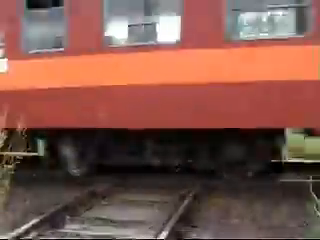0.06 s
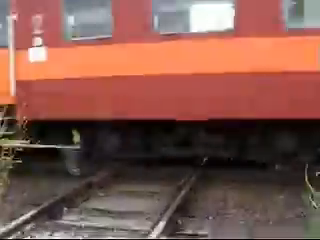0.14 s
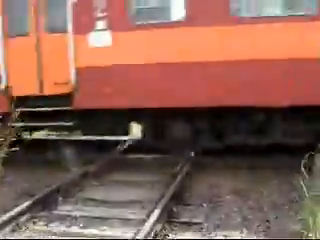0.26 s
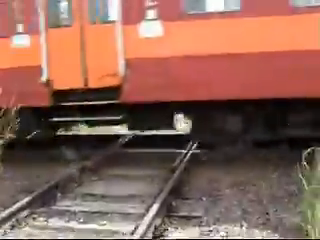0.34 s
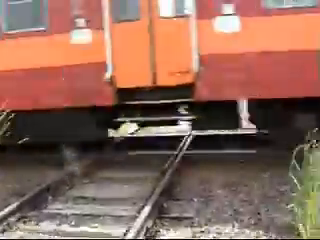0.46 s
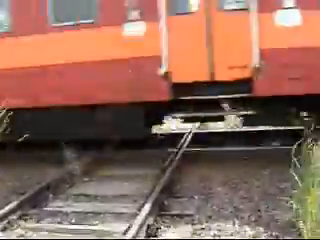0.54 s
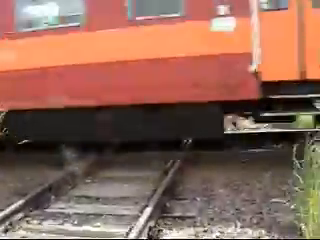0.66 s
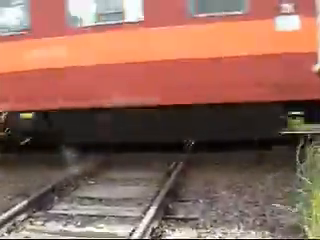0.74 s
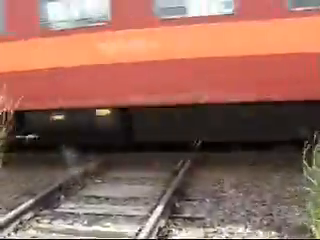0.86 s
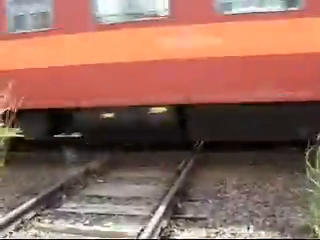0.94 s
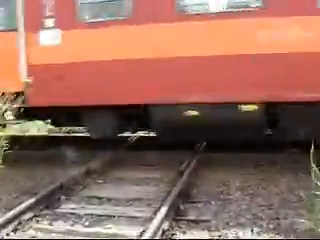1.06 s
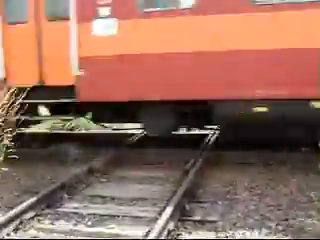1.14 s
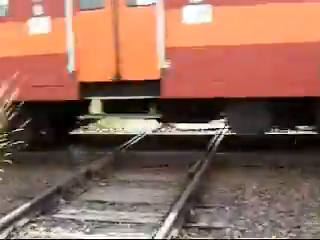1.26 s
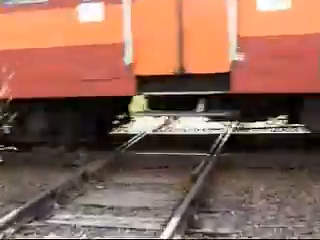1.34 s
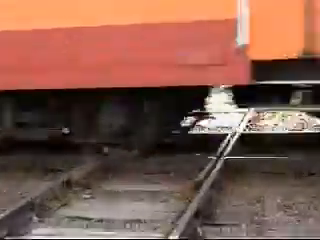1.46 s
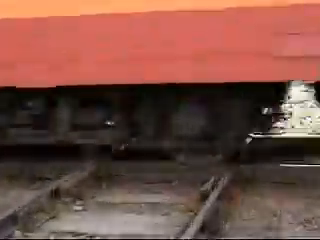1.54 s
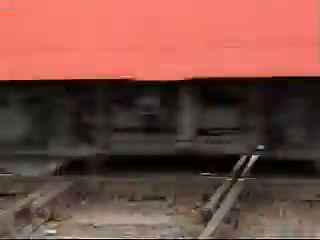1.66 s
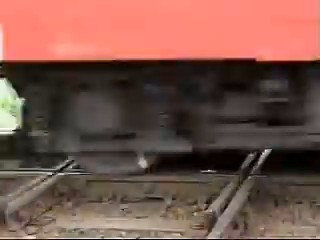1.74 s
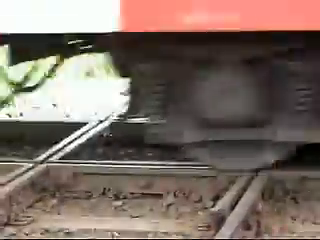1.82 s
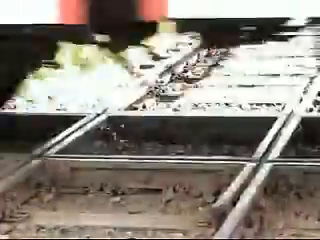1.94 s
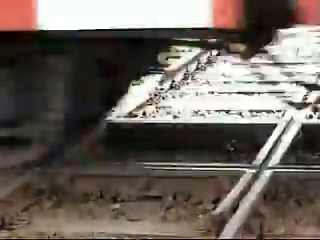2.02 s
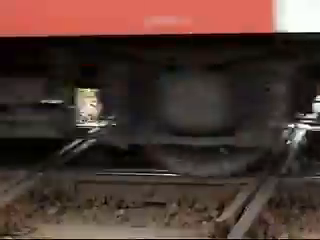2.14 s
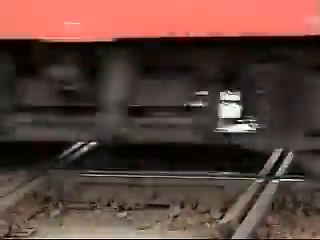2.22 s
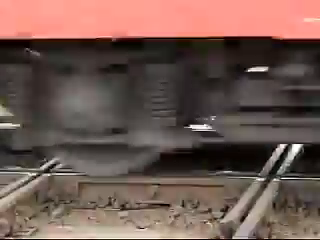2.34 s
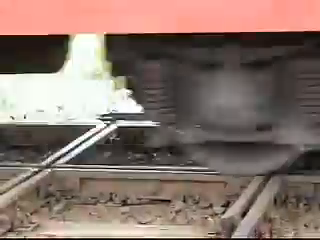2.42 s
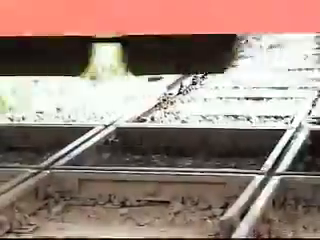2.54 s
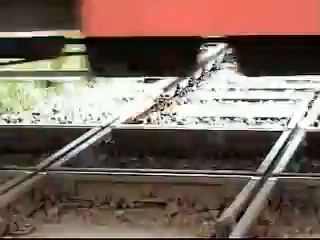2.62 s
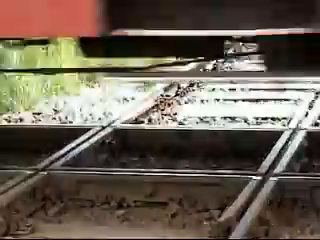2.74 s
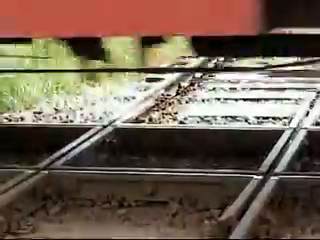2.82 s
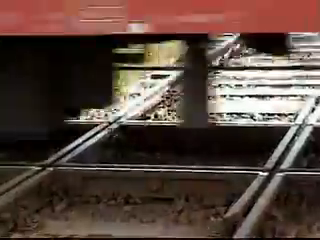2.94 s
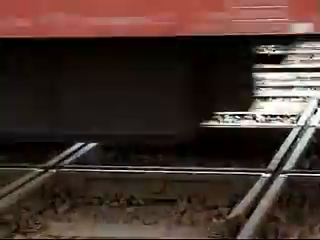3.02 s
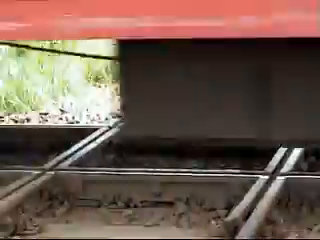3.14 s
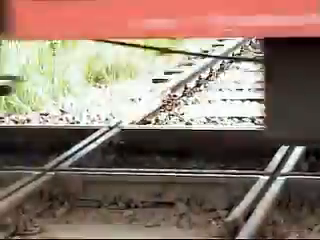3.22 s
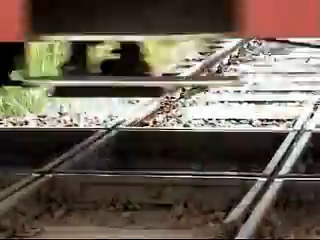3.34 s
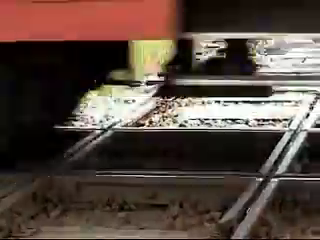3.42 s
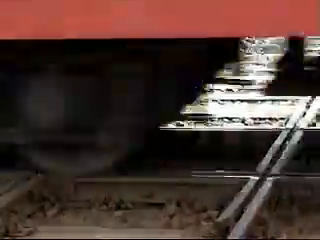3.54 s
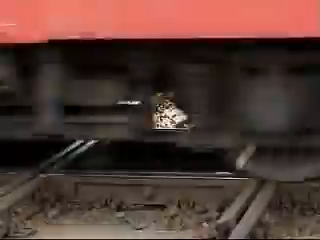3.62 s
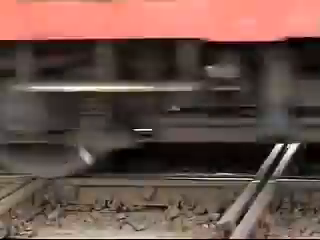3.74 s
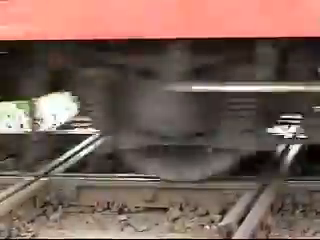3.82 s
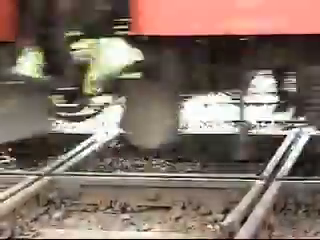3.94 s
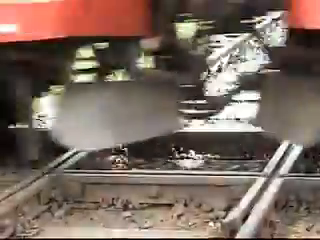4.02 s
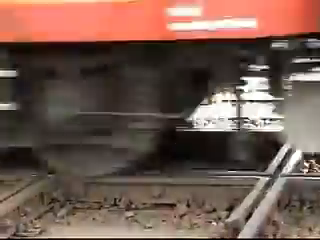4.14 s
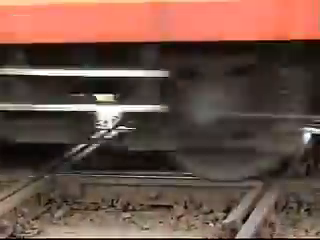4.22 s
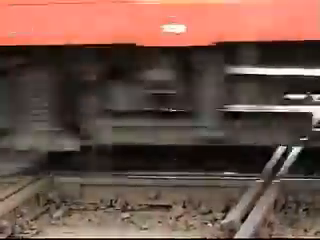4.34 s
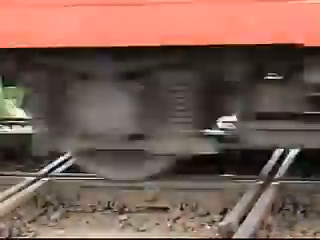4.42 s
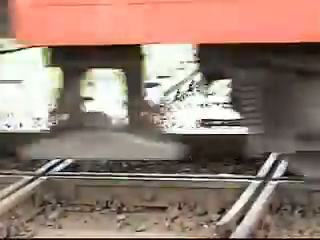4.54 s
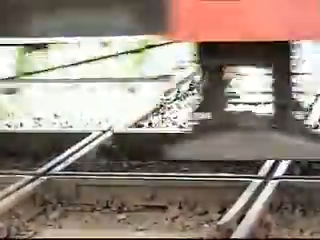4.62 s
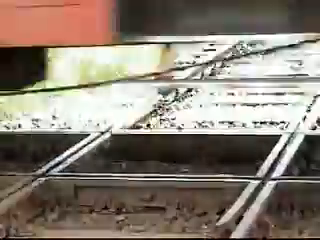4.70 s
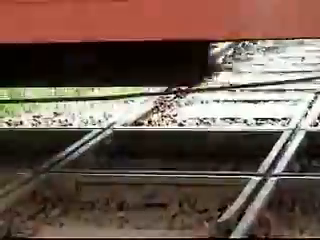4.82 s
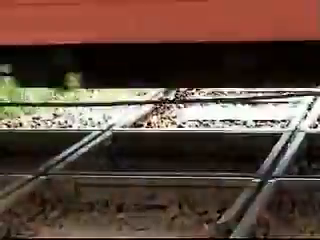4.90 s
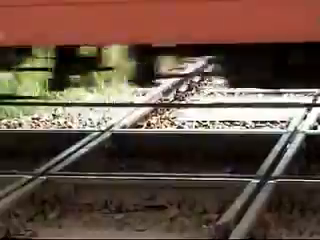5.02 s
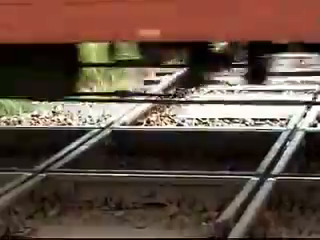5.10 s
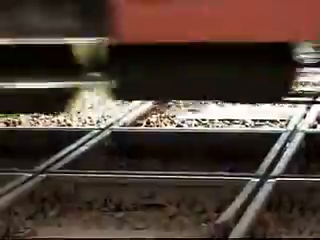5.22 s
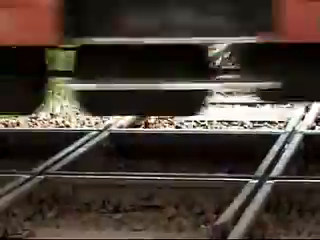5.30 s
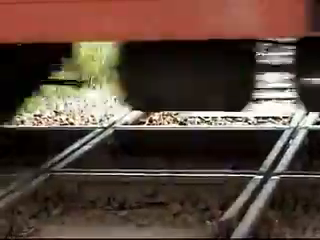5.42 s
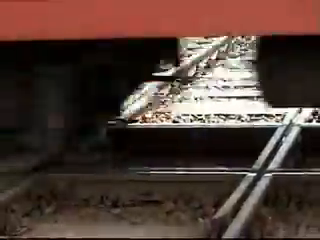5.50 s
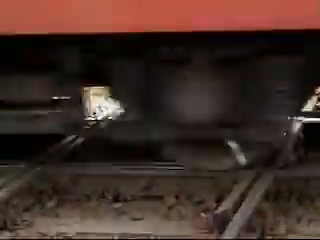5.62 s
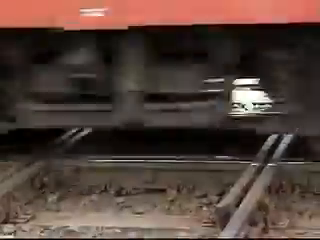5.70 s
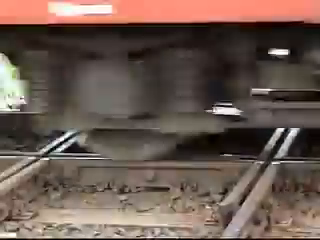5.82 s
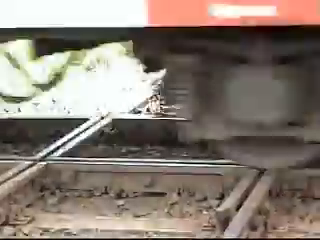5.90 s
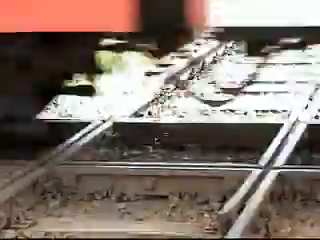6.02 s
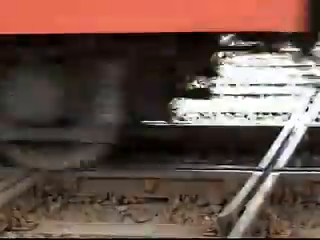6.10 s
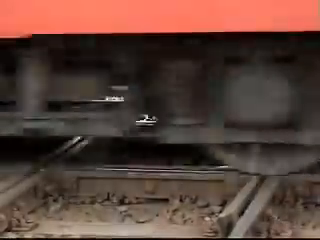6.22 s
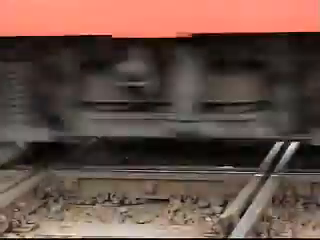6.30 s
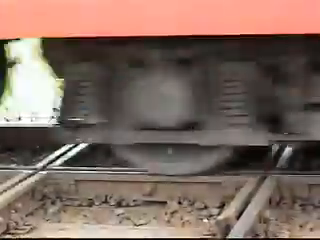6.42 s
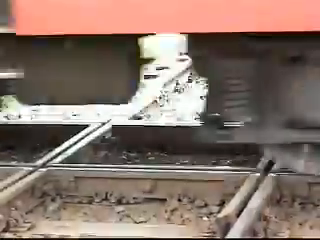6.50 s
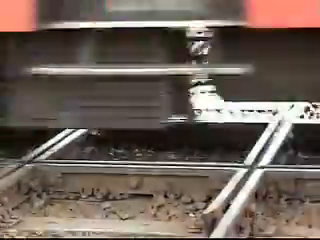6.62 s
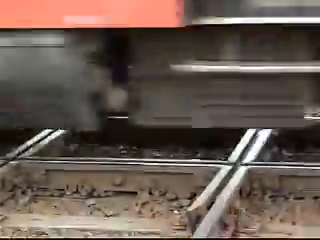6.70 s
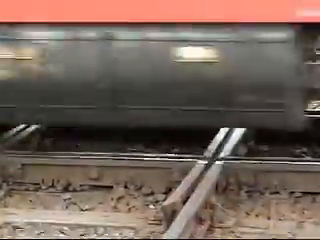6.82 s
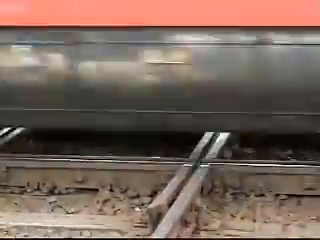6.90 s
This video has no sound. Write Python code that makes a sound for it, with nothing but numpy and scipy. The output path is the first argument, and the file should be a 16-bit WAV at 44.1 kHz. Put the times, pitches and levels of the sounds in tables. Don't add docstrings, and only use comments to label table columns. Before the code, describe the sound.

A passenger train is already rolling loudly past, a few metres from a small stereo microphone outdoors. Heavy knocks and booming thumps hit in the first half second, with gritty clanks and a softer joint tap. Until about 1.3 s only rumble and steely hiss continue. From 1.4 to 2.7 s two groups of wheels clatter over the gaps in close succession, one thump at 2.2 s especially heavy, with short wheel rings chiming after. The rolling sinks, then more clusters strike at about 3.4-4.1 s and 4.2-4.7 s. A quieter stretch follows. From 5.5 s another cluster runs into a heavy motor bogie pounding rapidly at 6.2-6.5 s, with the strongest low plate boom near 6.4 s. A faint tap follows, rumble and hiss ease, and a slightly fuzzy mid-pitched motor hum appears from 6.8 s to just before the end at 7 s.

```python
import sys
import numpy as np
from scipy import signal
from scipy.fft import rfft, irfft
from scipy.io import wavfile
from scipy.ndimage import uniform_filter1d

SR = 44100
rng = np.random.default_rng(int(sys.argv[2]) if len(sys.argv) > 2 else 0)


def level_to_linear(level):
    exponent = np.asarray(level, float) / 20
    return 10 ** exponent


def persist_wave(psi):
    counts = np.round(np.clip(psi, -1, 1) * 32767).astype(np.int16)
    wavfile.write(sys.argv[1], SR, np.atleast_2d(counts).T)


N = 306495

# (time [s], knock level [dB], clank level [dB], thump level [dB], sleeper pitch [Hz])
FIRST_GAP = [(0.191, -11.5, -20.5, -8.5, 241.5), (1.491, -11.5, -19.5, -7, 234),
             (1.756, -10.5, -21.5, -6, 268), (2.101, -13.5, -17.5, -5.5, 230), (2.362, -10.5, -18, -8, 244),
             (3.539, -10.5, -18.5, -11, 246), (3.797, -10.5, -18, -10, 253), (4.175, -10, -19, -9.5, 273.5),
             (4.432, -10.5, -17, -11, 287.5), (5.579, -9.5, -18.5, -12.5, 291),
             (5.83, -10.5, -19, -12, 293)]
# (time [s], knock level [dB], clank level [dB], thump level [dB], sleeper pitch [Hz])
SECOND_GAP = [
    (0.063, -10.5, -22.5, -6, 245),
    (1.633, -10, -19.5, -8.5, 369),
    (2.240, -9, -21, -3, 212),
    (3.676, -8, -19, -6.5, 238),
    (4.315, -9, -20.5, -8, 231),
    (5.716, -12, -19.5, -8, 252.6),
]
# (time [s], knock level [dB], clank level [dB], thump level [dB], sleeper pitch [Hz])
TRAILING = [
    (0.338, -9, -22, -5.5, 239),
    (1.898, -8.5, -20, -8.5, 194),
    (2.503, -9, -21, -7.5, 183),
    (3.936, -8.5, -19, -10, 188),
    (4.571, -10.5, -19, -8, 243),
    (5.965, -8.5, -19, -8, 272),
]
# (time [s], knock level [dB], clank level [dB], thump level [dB], sleeper pitch [Hz])
MOTOR_BOGIE = [
    (6.162, -12.5, -16.5, -11.5, 263),
    (6.291, -10, -18.5, -6.5, 204),
    (6.413, -12, -17, -10, 269),
    (6.542, -12, -17, -6.5, 242),
]
GAP_BLOWS = FIRST_GAP + SECOND_GAP + TRAILING + MOTOR_BOGIE


def evened(x):
    return x / np.sqrt(np.mean(x ** 2) + 1e-20)


def peaked(x, db):
    return x * level_to_linear(db) / np.sqrt(uniform_filter1d(x ** 2, 180).max() + 1e-20)


def read(points, hz):
    f, value = np.transpose(points)
    return np.interp(np.log(hz + 1), np.log(f + 1), value)


def add(mix, s, sound):
    part = mix[max(round(s * SR), 0):][:len(sound)]
    part += sound[:len(part)]


def resonate(x, hz, width):
    r = np.exp(-np.pi * max(width, 3.) / SR)
    return 2 * signal.lfilter([1 - r], [1, -r * np.exp(2j * np.pi * hz / SR)], x).real


def shape(t, rise, t60):
    return (1 - np.exp(-(t / rise) ** 2)) * level_to_linear(-60 * t / np.clip(t60, .03, .6))


def gritty(size, grit_db, per_s):
    steps = level_to_linear(grit_db * rng.standard_normal(size // round(SR / per_s) + 2))
    strength = np.interp(np.arange(size) * per_s / SR, np.arange(len(steps)), steps)
    return rng.standard_normal(size) * strength


def wobbling(size, depth, smooth):
    return 1 + depth * evened(uniform_filter1d(rng.standard_normal(size), size=smooth))


def levels():
    # (time [s], level [dB])
    load_points = [(0.0, -16), (0.21, -18), (0.55, -22.5), (0.95, -21), (1.24, -20), (1.4, -18),
                   (1.9, -18.5), (2.32, -23), (2.7, -25), (3.35, -23), (3.6, -19.5), (3.95, -23.5),
                   (4.35, -19.5), (4.74, -25.5), (5.3, -23), (5.65, -19.5), (6.3, -21.5), (6.95, -26)]
    axle_lag_s, axle_reach_s, bogie_reach_s = .08, 0.09, 0.42
    t = np.arange(0, N / SR + .01, .005)
    load_db = np.interp(t, *np.transpose(load_points))
    axles = np.array([row[0] for row in FIRST_GAP + MOTOR_BOGIE[::2]])
    apart = t - axle_lag_s - axles[:, None]
    near, group = ((1 / (1 + (apart / reach) ** 2)).sum(0) for reach in (axle_reach_s, bogie_reach_s))
    hiss_db = -35.5 + 0.58 * (load_db + 23) + 1.5 * near + 0.62 * (group - 1.5)
    return [np.interp(np.arange(N) / SR, t, v) for v in (load_db, hiss_db)]


def rolling():
    # (frequency [Hz], density [dB per Hz])
    rumble_colour = [(15, -55), (25, -17.5), (49, -22.5), (85, -16), (184, -2), (248, 2), (315, -14),
                     (350, -2.5), (472, -13), (565, -25.5), (810, -35.5), (900, -23.5), (1170, -47),
                     (1980, -120)]
    # (frequency [Hz], density [dB per Hz])
    hiss_colour = [(290, -30), (500, 3), (562, -9.5), (695, -1.5), (810, -0.5), (921, -0.5), (1560, -6.5),
                   (2920, -10), (3360, -14.5), (7040, -25), (8300, -34), (10800, -71), (18300, -120)]
    frames, hz = N // 128 + 9, np.fft.rfftfreq(1024, 1 / SR)
    a, b, lumps, patches = rng.standard_normal((frames, 513, 4)).T
    lumps = evened(uniform_filter1d(uniform_filter1d(lumps, 3, 0), 14, 1))
    patches = evened(uniform_filter1d(uniform_filter1d(patches, 8, 0), 20, 1))
    rumble_db, hiss_db = levels()
    nearness_db = np.interp(np.arange(frames) * 128, np.arange(N), hiss_db) + 33
    brighter_db = 0.52 * np.outer(np.log2(np.maximum(hz / 2500, 1)), nearness_db)
    layers = ((rumble_colour, hz < 900, 1.2 * lumps, rumble_db - 0.5),
              (hiss_colour, hz > 500, 1.1 * patches + brighter_db, hiss_db + 1.0))
    out = np.zeros(N)
    for colour, band, rough_db, level_db in layers:
        z = (a + 1j * b) * (level_to_linear(read(colour, hz)) * band)[:, None] * level_to_linear(rough_db)
        noise = signal.istft(z, nperseg=1024, noverlap=896)[1][:N]
        out += evened(noise) * level_to_linear(level_db)
    return out


def struck():
    t = np.arange(0, N / SR + .01, .002)
    since = t - np.array([row[0] + 0.013 for row in GAP_BLOWS])[:, None]
    ringing = (since > 0) * np.exp(-abs(since) / 0.075)
    return np.interp(np.arange(N) / SR, t, ringing.sum(0))


def singing():
    # (frequency [Hz], width [Hz], level [dB])
    wheel_tones = [(2010, 76, 0), (2690, 46, -0.5), (3556, 69, -2.5), (4010, 47, -11), (4330, 40, -6.5),
                   (4630, 30, -7.5), (6600, 40, -16), (7310, 33, -16.5)]
    hiss_db = levels()[1]
    t = np.arange(N) / SR
    out = np.zeros(N)
    for hz, width, db in wheel_tones:
        comes_db = 3 * np.interp(t * 12, np.arange(100), rng.standard_normal(100))
        tone = resonate(resonate(rng.standard_normal(N), hz, width), hz, 3 * width)
        out += level_to_linear(db + comes_db) * evened(tone)
    ring_on_db = 7
    return evened(out) * level_to_linear(2 * (hiss_db + 30.5) - 41.5) * (1 + level_to_linear(ring_on_db) * struck())


def knock(s, db, hz, t60, wave_db):
    # (frequency [times the rail pitch], width [Hz], level [dB])
    rail_modes = [(0.619, 140, 5), (0.822, 119, 5.5), (0.998, 120.3, 11.5), (1.192, 142, -2),
                  (1.501, 211, -3.5)]
    t = np.arange(SR // 4) / SR
    glide = 1.078 * hz * (1 + 0.31 * np.exp(-t / 0.0049))
    wave = np.exp(-((t - .005) / 0.0023) ** 2) * np.sin(2 * np.pi * np.cumsum(glide) / SR)
    drive = gritty(len(t), 2.5, 697.7) * (shape(t, 0.0044, 0.98 * t60) + 0.14 * shape(t, 0.01, 1.3 * t60))
    rail = sum(level_to_linear(g) * resonate(resonate(drive, hz * k, w), hz * k, 5.8 * w) / np.sqrt(w)
               for k, w, g in rail_modes)
    rail = signal.sosfilt(signal.butter(4, 2200., fs=SR, output="sos"), rail)
    rattle = signal.sosfilt(signal.butter(2, [500., 3200.], "bandpass", fs=SR, output="sos"), drive)
    tick = peaked(rng.standard_normal(len(t)) * shape(t, .005, .1), -33)
    return s - .003, level_to_linear(db) * (peaked(rail, -1.5) + peaked(wave, wave_db) + peaked(rattle, -16.0) + tick)


def clank(s, db, tilt_db, t60, rise):
    # (frequency [Hz], density [dB per Hz])
    steel_colour = [(710, -5.5), (1200, -4.5), (1470, 2), (2590, -4.5), (3250, -7.5), (3910, -3.5),
                    (4240, -8), (5630, -11), (7470, -15.5), (8300, -46), (10800, -66), (18300, -120)]
    # (frequency [Hz], width [Hz], level [dB])
    wheel_modes = [(1806, 85, 0.5), (1990, 130, 7), (2653, 52, 2.5), (2990, 39, -11), (3686, 34, 1),
                   (4600, 120, -1)]
    t = np.arange(SR // 3) / SR
    burst = gritty(len(t), 1.3, 500)
    burst = burst * (shape(t, np.clip(rise, .001, .03), t60) + 0.15 * shape(t, 0.00073, 0.06))
    f = np.fft.rfftfreq(len(t), 1 / SR)
    hump = np.exp(-(np.log(f / 1900 + 1e-9) / 0.2) ** 2)
    colour = level_to_linear(read(steel_colour, f) + (tilt_db - 4.5) * hump)
    steel = peaked(irfft(rfft(burst) * colour), 0)
    detune, strength = rng.standard_normal((2, len(wheel_modes)))
    rings = sum(level_to_linear(g + 8.8 * b) * resonate(burst, hz * (1 + 0.019 * a), max(2.3 * w, 22)) / np.sqrt(w)
                for (hz, w, g), a, b in zip(wheel_modes, detune, strength))
    landing = resonate(resonate(burst * shape(t, .001, 0.083), 880.0, 400.), 970.0, 600.)
    return s - .003, level_to_linear(db) * (steel + peaked(rings, -6.5) + peaked(landing, 2.9))


def thump(s, db, hz, t60, deep_db):
    t = np.arange(SR // 3) / SR
    push = rng.standard_normal(len(t)) * shape(t, 0.0028, 0.48 * t60)
    pitch = hz * wobbling(len(t), 0.057, 500)
    sleeper = np.sin(2 * np.pi * np.cumsum(pitch) / SR) * shape(t, 0.0048, 0.62 * t60)
    neighbour = peaked(resonate(push, hz * 1.33, 73.0), -7.0)
    body = peaked(sleeper, 0) + peaked(resonate(push, hz, 60.), -5.0) + neighbour
    deep = peaked(resonate(resonate(push, 150., 65.0), 150., 100.0), deep_db)
    soft = signal.butter(2, [85., 700.], "bandpass", fs=SR, output="sos")
    return s - .002, peaked(signal.sosfilt(soft, body + deep), db)


def blow(wheels, rail_hz, rail_t60, wave_db, land_s, tilt_db, clank_t60, rise, sleeper_s, sleeper_t60, deep_db):
    for s, knock_db, clank_db, thump_db, sleeper_hz in wheels:
        wheel_hz = rail_hz * (1 + 0.044 * rng.standard_normal())
        damped_t60 = sleeper_t60 * level_to_linear(0.7 * (-9 - thump_db))
        yield knock(s, knock_db, wheel_hz, rail_t60, wave_db)
        yield clank(s + land_s, clank_db, tilt_db, clank_t60, rise)
        yield thump(s + sleeper_s, thump_db, sleeper_hz, damped_t60, deep_db)


def entry_joint():
    # (time [s], knock level [dB], clank level [dB], thump level [dB], sleeper pitch [Hz])
    entry_wheels = [
        (1.36, -15.5, -25, -14, 377),
        (1.973, -17.5, -36, -23, 265),
        (3.415, -15.5, -25, -9.5, 234),
        (4.053, -21, -32, -15, 280),
        (5.455, -15.5, -25.5, -15, 235),
    ]
    early_s, weaker_db = .012, -10
    followers = [(s - early_s, a + weaker_db, b + weaker_db, c + weaker_db, hz)
                 for s, a, b, c, hz in SECOND_GAP]
    return blow(entry_wheels + followers, rail_hz=792, rail_t60=0.21, wave_db=-5, land_s=0.0009, tilt_db=16,
                clank_t60=0.2, rise=.004, sleeper_s=-.003, sleeper_t60=0.18, deep_db=-9)


def second_gap():
    return blow(SECOND_GAP, rail_hz=850, rail_t60=0.15, wave_db=-11, land_s=-0.000984, tilt_db=2.7,
                clank_t60=0.24, rise=0.0084, sleeper_s=-0.00391, sleeper_t60=.15, deep_db=-10.5)


def ring(s, hz, db, length):
    t = np.arange(round((length + .1) * SR)) / SR
    split, start = rng.random((2, 2, 1))
    swell = (1 - np.exp(-t / 0.0052)) * level_to_linear(-40. * t) / (1 + np.exp((t - length) / 0.016))
    twin_hz = hz + np.array([[-1], [1]]) * (25 + 70 * split)
    twins = np.sin(2 * np.pi * (twin_hz * t + start)).sum(0)
    return s, level_to_linear(db) * swell * (np.sin(2 * np.pi * hz * t) + .28 * twins)


def rims():
    # (frequency [Hz], level [dB])
    rim_modes = [(1990, -41), (2720, -43.5), (3640, -42.5), (4030, -47.5), (4560, -48.5), (6000, -52),
                 (6680, -50), (7300, -52)]
    for row in GAP_BLOWS:
        for k in rng.permutation(len(rim_modes))[:3]:
            late, strength, detune, long = rng.standard_normal(size=4)
            hz, db = rim_modes[k]
            start_s = row[0] + 0.039 * (.6 + .6 * abs(late))
            length_s = 0.029 * (0.62 + 0.55 * abs(long))
            yield ring(start_s, hz * (1 + 0.014 * detune), db + 7.5 * strength, length_s)


def wheel_rings():
    # (time [s], frequency [Hz], level [dB], length [s])
    ring_events = [(0.185, 2105, -19.5, 0.028), (0.192, 7350, -35, 0.031), (0.235, 3980, -26.5, 0.032),
                   (1.79, 3960, -36, 0.053), (2.124, 4020, -27, 0.053), (2.135, 2780, -31, 0.064),
                   (2.152, 3640, -33.5, 0.16), (2.185, 4350, -33, 0.062), (2.318, 3646, -34, 0.05),
                   (2.397, 2720, -35, 0.13), (2.429, 3560, -36, 0.066), (2.569, 1981, -32, 0.042),
                   (3.552, 3650, -29, 0.083), (3.557, 3820, -30, 0.07), (3.822, 3720, -32, 0.095),
                   (3.838, 2000, -32, 0.13), (3.839, 4651, -34, 0.11), (3.986, 3700, -36, 0.08),
                   (4.209, 2550, -21, 0.026), (4.588, 3800, -36, 0.14), (4.73, 5000, -42, 0.083),
                   (5.454, 1995, -34, 0.13), (5.607, 3990, -30, 0.04), (5.737, 1976, -31, 0.065),
                   (5.894, 3600, -37, 0.11), (5.904, 2000, -32, 0.12), (6.152, 7500, -46, 0.1),
                   (6.441, 4070, -35, 0.059)]
    return [ring(*row) for row in ring_events]


def first_gap():
    return blow(FIRST_GAP, rail_hz=947, rail_t60=0.22, wave_db=-3, land_s=.013, tilt_db=4,
                clank_t60=0.22, rise=0.0021, sleeper_s=0.0014, sleeper_t60=.25, deep_db=-12)


def boom(s, db, hz, t60):
    t = np.arange(SR // 3) / SR
    pitch = hz * wobbling(len(t), .03, 900)
    return s, level_to_linear(db) * np.sqrt(2) * np.sin(2 * np.pi * np.cumsum(pitch) / SR) * shape(t, .015, t60)


def plate_booms():
    # (time [s], level [dB], frequency [Hz], time to fall 60 dB [s])
    boom_events = [
        (0.217, -11.5, 242, 0.33),
        (0.345, -9, 249.6, 0.32),
        (1.37, -18.5, 300.5, 0.54),
        (1.495, -10, 241, 0.39),
        (2.245, -15, 349, .2),
        (3.42, -18, 243.6, 0.42),
        (4.185, -15.5, 265.4, .45),
        (5.465, -17, 237, 0.34),
        (5.841, -21, 284, 0.45),
        (6.436, -3.5, 252, .25),
    ]
    return [boom(*row) for row in boom_events]


def trailing_wheels():
    return blow(TRAILING, rail_hz=833, rail_t60=0.15, wave_db=-8.5, land_s=.003, tilt_db=3.5,
                clank_t60=.31, rise=.004, sleeper_s=-0.00096, sleeper_t60=.15, deep_db=-14)


def exit_joint():
    # (time [s], knock level [dB], clank level [dB], thump level [dB], sleeper pitch [Hz])
    exit_wheels = [
        (0.494, -15.5, -27, -9.5, 266.6),
        (2.053, -16.5, -25.5, -9.5, 283),
        (2.658, -16, -29, -15, 200),
        (4.09, -13.5, -27.5, -14.5, 287),
        (4.719, -18.5, -28.5, -14, 266),
        (6.116, -16.5, -29, -13, 263),
        (6.686, -23, -31, -14.5, 252),
    ]
    return blow(exit_wheels, rail_hz=785, rail_t60=0.11, wave_db=-5.5, land_s=-.002, tilt_db=11.5,
                clank_t60=.15, rise=.004, sleeper_s=-.002, sleeper_t60=0.14, deep_db=-6)


def motor_bogie():
    return blow(MOTOR_BOGIE, rail_hz=834, rail_t60=.14, wave_db=-3, land_s=.004, tilt_db=4,
                clank_t60=0.13, rise=0.0049, sleeper_s=-0.00296, sleeper_t60=0.26, deep_db=-5.5)


def motor():
    # (time [s], frequency [Hz], level [dB])
    hum_points = [(6.765, 474, -35), (6.79, 503, -30), (6.88, 490.7, -29.5), (6.91, 468, -39),
                  (6.95, 510, -25)]
    s, hz, db = np.transpose(hum_points)
    t = np.arange(s[0], s[-1], 1 / SR)
    waver = wobbling(len(t), 0.2, 500)
    hum = np.sqrt(2) * waver * np.sin(2 * np.pi * np.cumsum(np.interp(t, s, hz)) / SR)
    return s[0], hum * level_to_linear(np.interp(t, s, db)) * signal.windows.tukey(len(t), .1)


def spread_out(train):
    # (frequency [Hz], likeness [0-1])
    same_points = [(30, .8), (60, .985), (120, .999), (240, .994), (490, .93), (980, .91), (1980, .86),
                   (3980, .68), (6500, .85), (8010, .95)]
    # (frequency [Hz], left over right [dB])
    lean_points = [(310, 0), (530, -1.5), (910, -2.2), (1570, -4.3), (2700, -4.5), (4000, -1), (5000, .5),
                   (8010, 0)]
    # (frequency [Hz], left leads [radians])
    lead_points = [(150, 0), (520, -.25), (1500, .1), (4050, .6), (8180, -.1)]
    hz, t, z = signal.stft(train, SR, nperseg=256, noverlap=192)
    drift = rng.standard_normal((len(t), len(hz), 2))
    a, b = uniform_filter1d(uniform_filter1d(drift, size=12, axis=0), size=2, axis=1).T
    same = np.clip(read(same_points, hz), 0, 1)[:, None]
    spread = np.sqrt((1 - same) / 4) * (evened(a) + 1j * evened(b))
    common = np.sqrt((1 + same) / 2)
    lean = (level_to_linear(read(lean_points, hz) / 2) * np.exp(.5j * read(lead_points, hz)))[:, None]
    sides = z * np.array([(common + spread) * lean, (common - spread) / lean])
    return signal.istft(sides, SR, nperseg=256, noverlap=192)[1][:, :N]


def scene():
    train = rolling() + singing()
    sources = (entry_joint, second_gap, rims, wheel_rings, first_gap, plate_booms,
               trailing_wheels, exit_joint, motor_bogie)
    for source in sources:
        for hit in source():
            add(train, *hit)
    add(train, *motor())
    return spread_out(train)


def low_pass(x):
    return signal.sosfilt(signal.butter(12, 8610, fs=SR, output="sos"), x)


def record(dry):
    thin = signal.sosfilt(signal.butter(1, 63.6, "highpass", fs=SR, output="sos"), dry)
    limited = thin / (1 + np.abs(thin / 1.0) ** 6) ** (1 / 6)
    treble_cut = signal.firwin(301, 7983, window=("kaiser", 8), fs=SR)
    edged = signal.oaconvolve(limited, treble_cut[None], "same")
    return low_pass(edged)


dry = scene()
out = record(dry)
persist_wave(out)
```